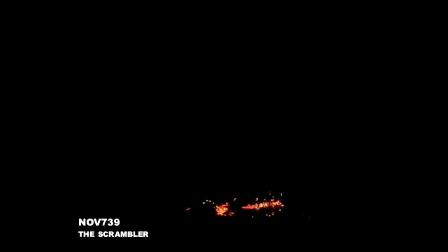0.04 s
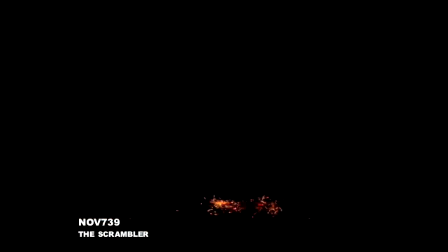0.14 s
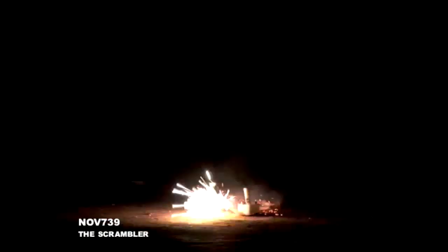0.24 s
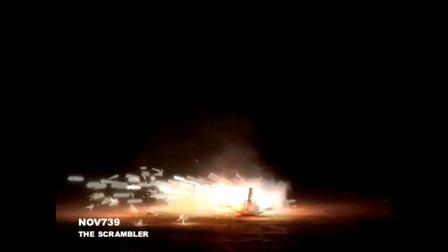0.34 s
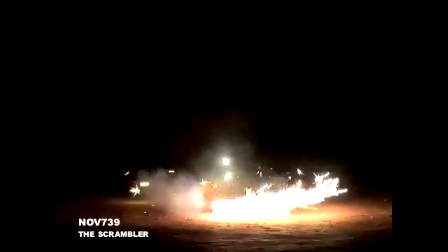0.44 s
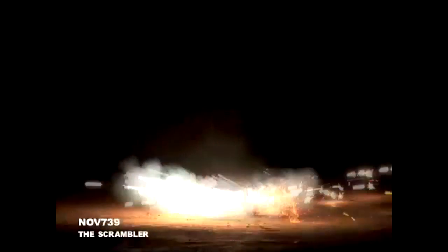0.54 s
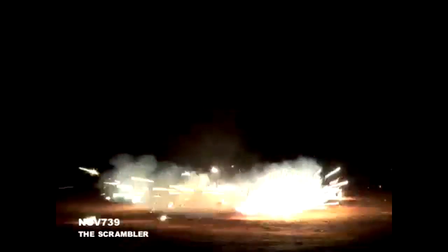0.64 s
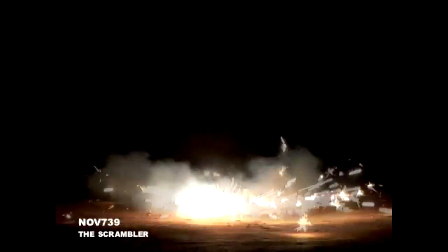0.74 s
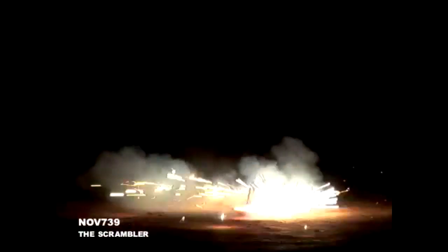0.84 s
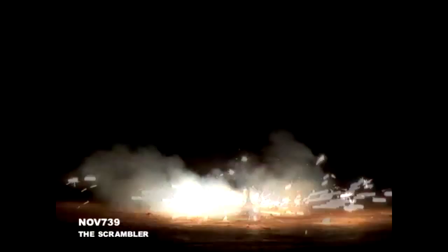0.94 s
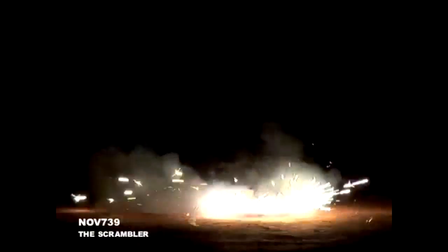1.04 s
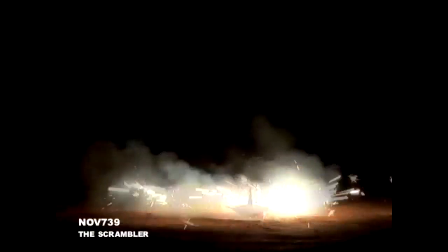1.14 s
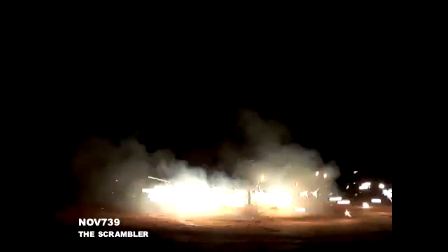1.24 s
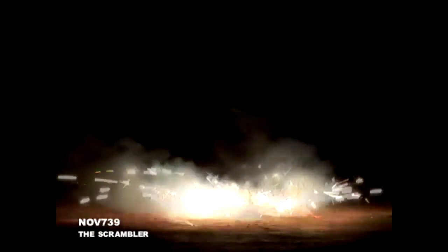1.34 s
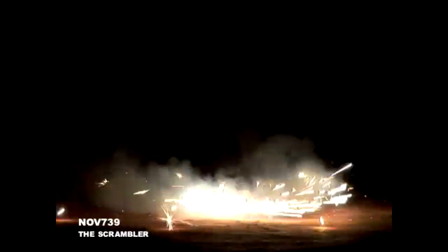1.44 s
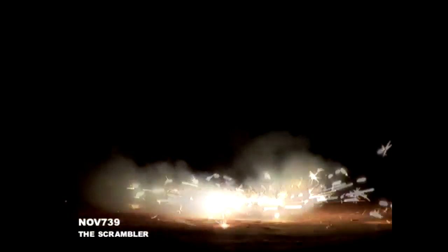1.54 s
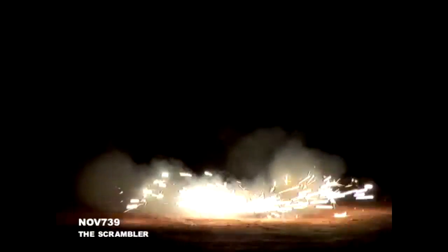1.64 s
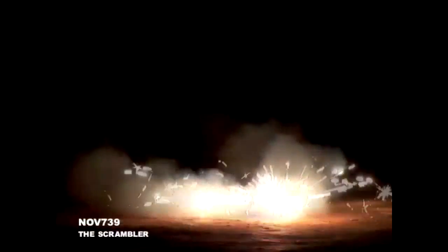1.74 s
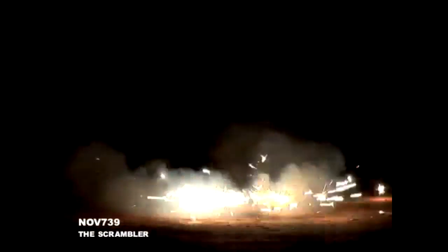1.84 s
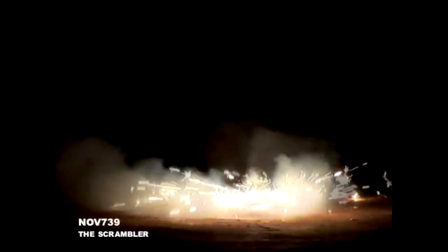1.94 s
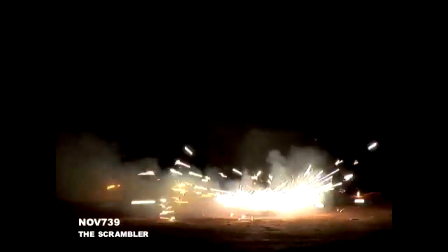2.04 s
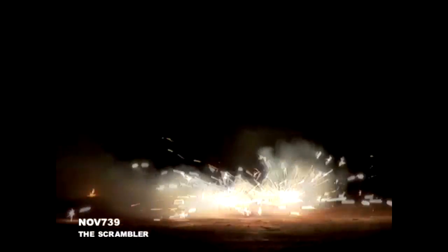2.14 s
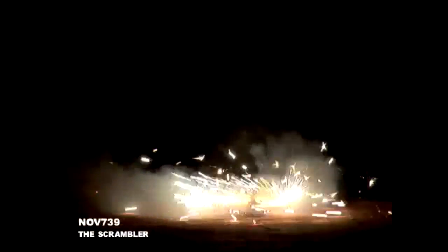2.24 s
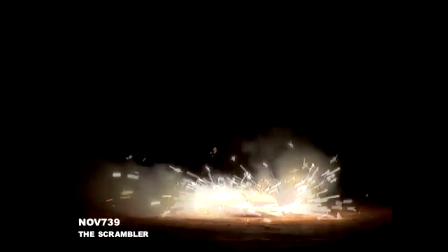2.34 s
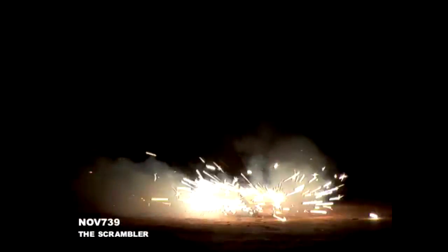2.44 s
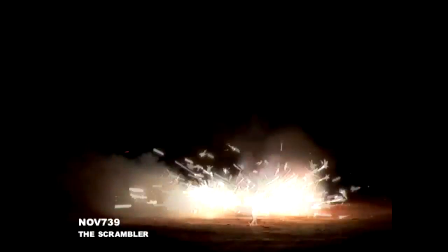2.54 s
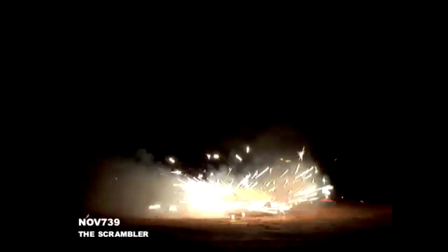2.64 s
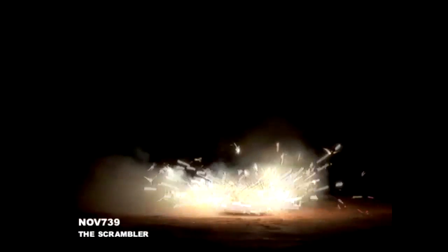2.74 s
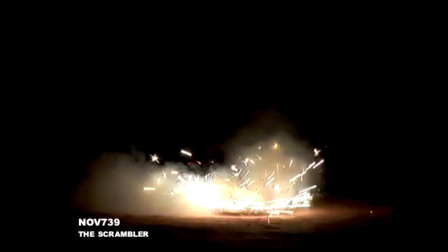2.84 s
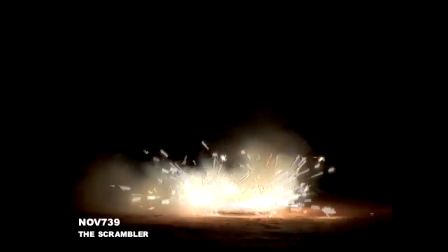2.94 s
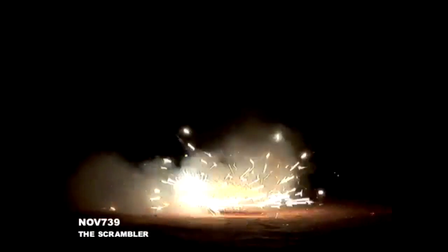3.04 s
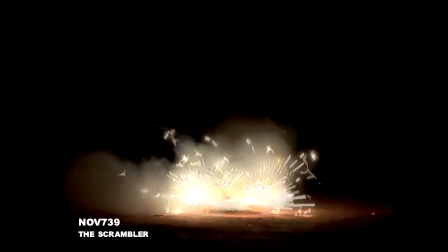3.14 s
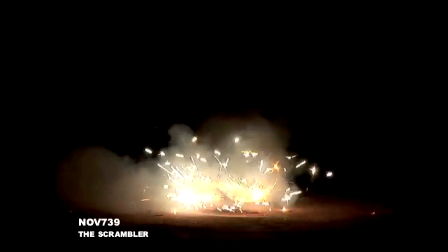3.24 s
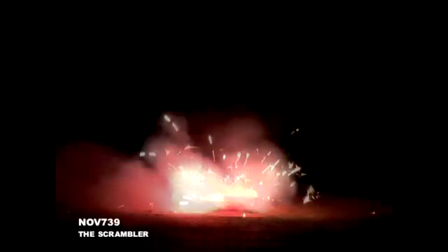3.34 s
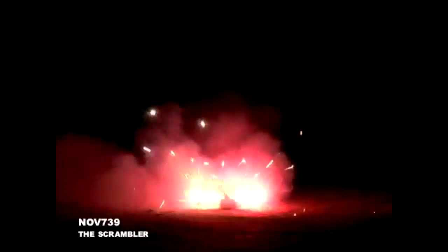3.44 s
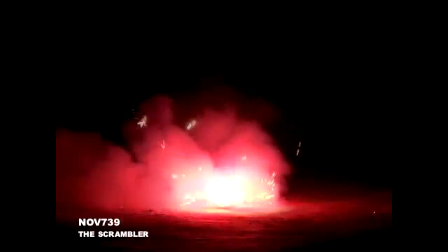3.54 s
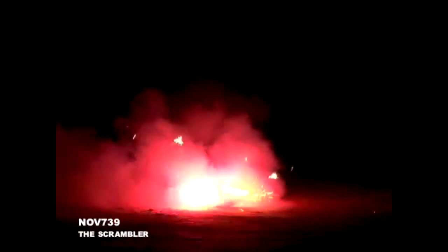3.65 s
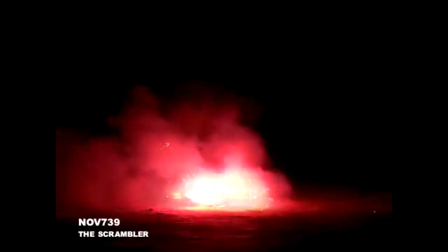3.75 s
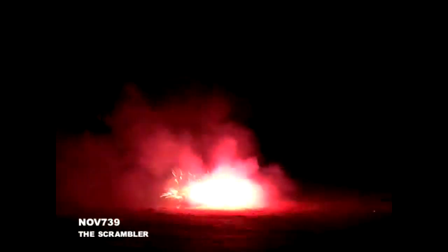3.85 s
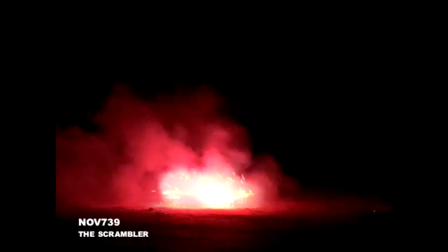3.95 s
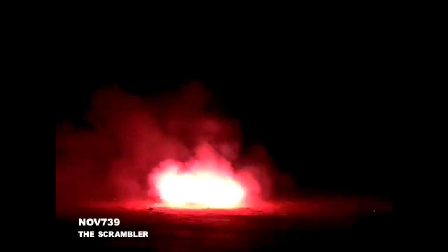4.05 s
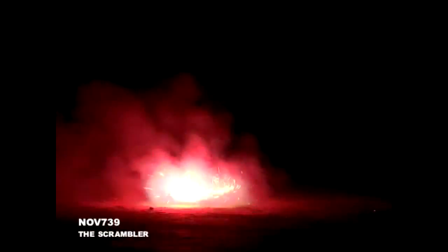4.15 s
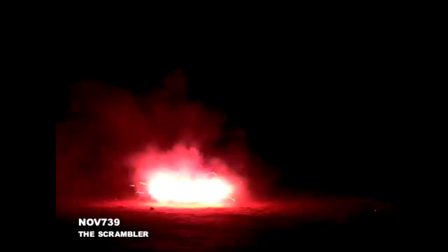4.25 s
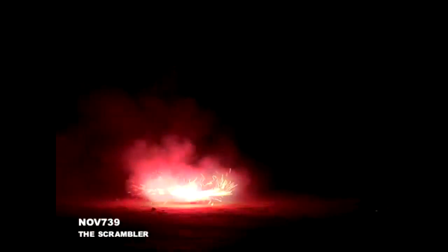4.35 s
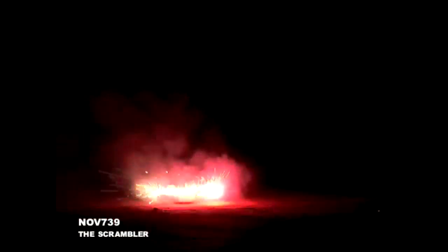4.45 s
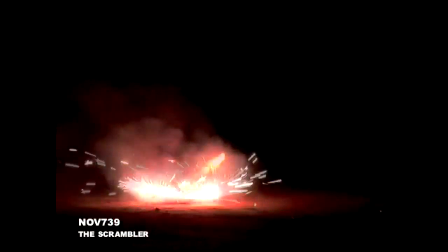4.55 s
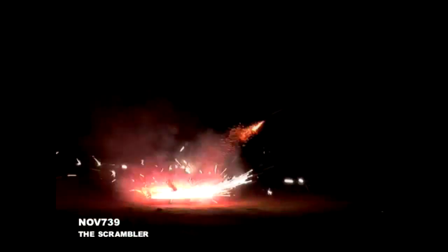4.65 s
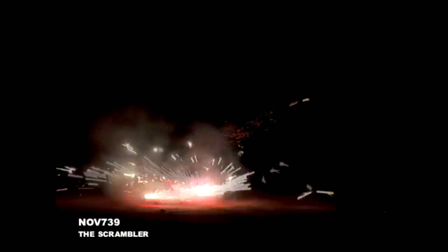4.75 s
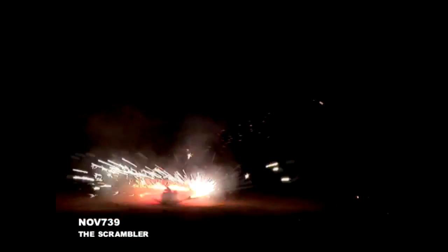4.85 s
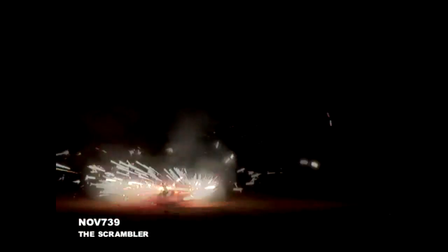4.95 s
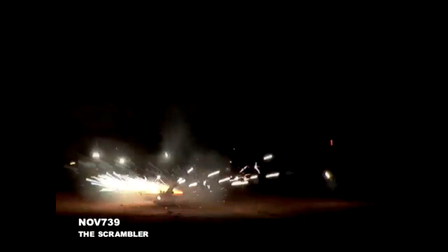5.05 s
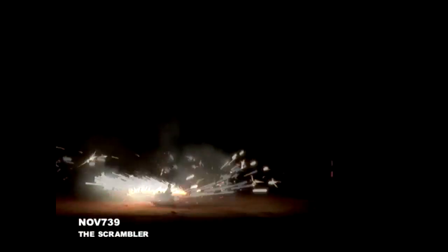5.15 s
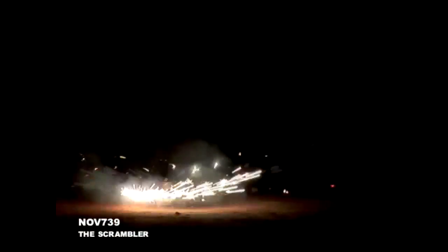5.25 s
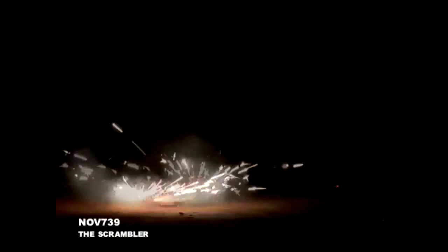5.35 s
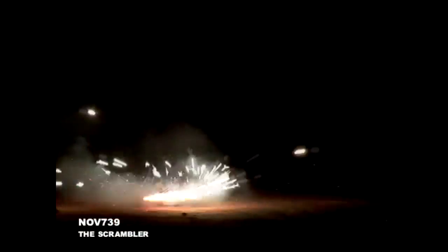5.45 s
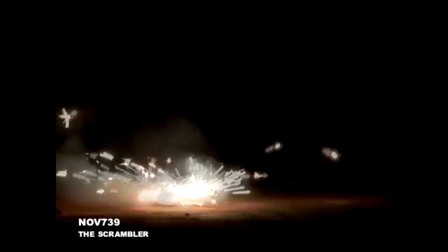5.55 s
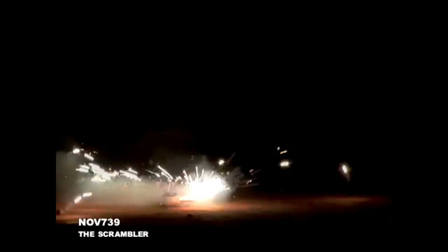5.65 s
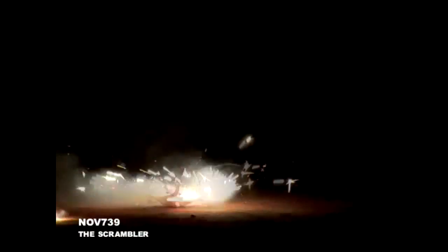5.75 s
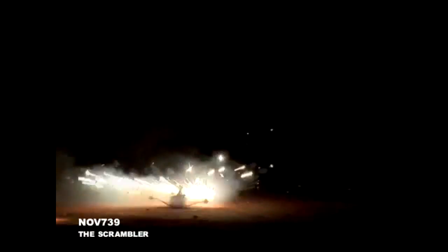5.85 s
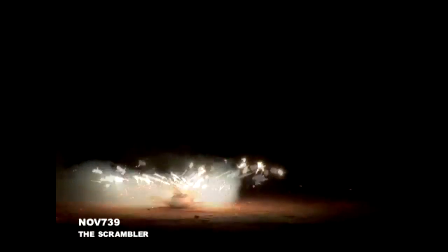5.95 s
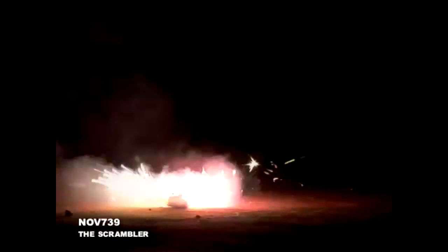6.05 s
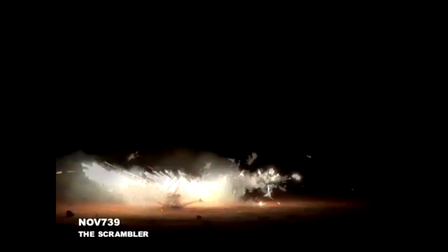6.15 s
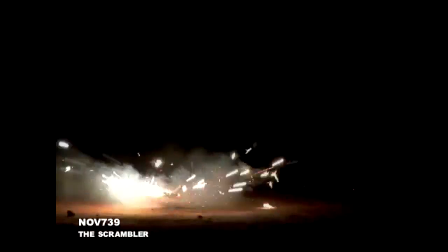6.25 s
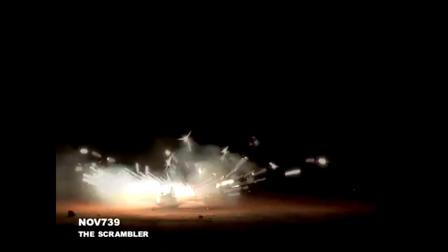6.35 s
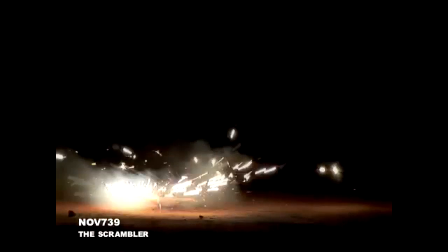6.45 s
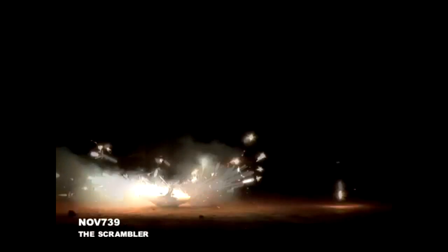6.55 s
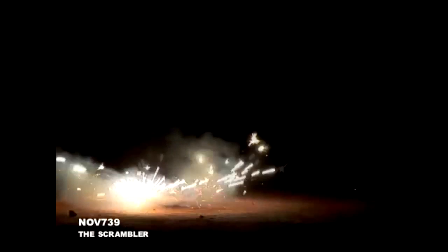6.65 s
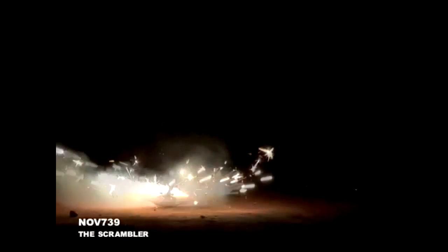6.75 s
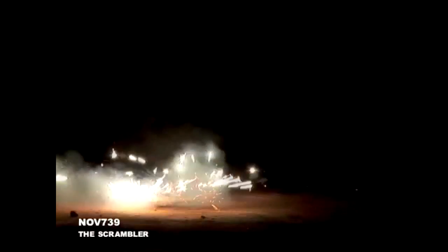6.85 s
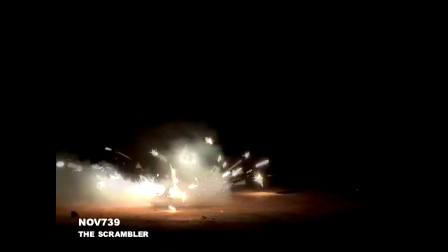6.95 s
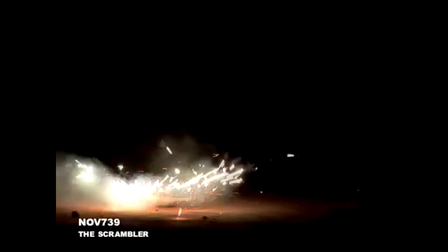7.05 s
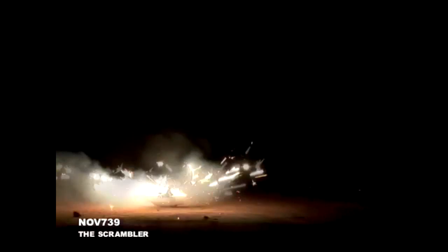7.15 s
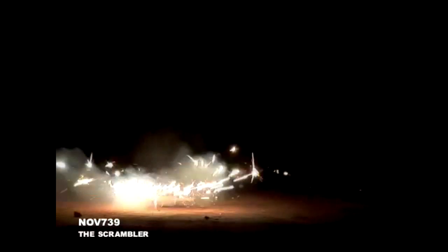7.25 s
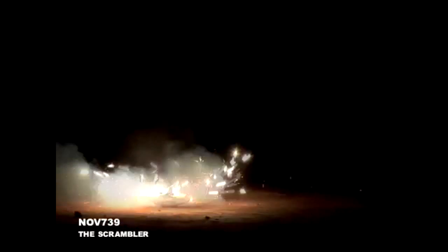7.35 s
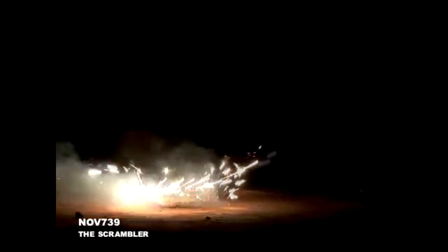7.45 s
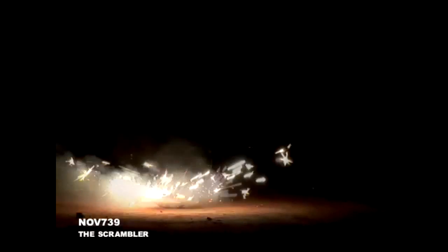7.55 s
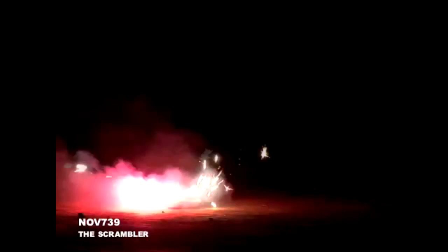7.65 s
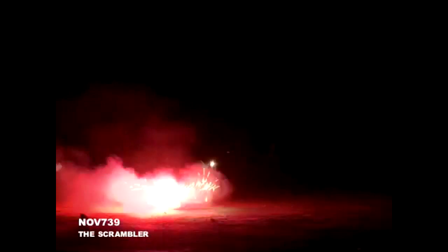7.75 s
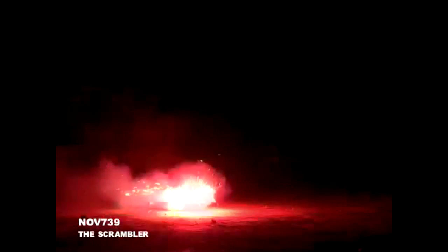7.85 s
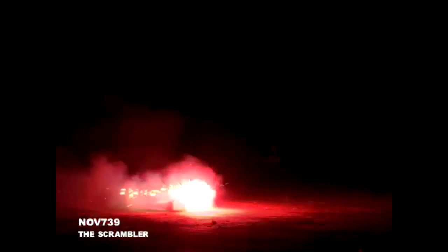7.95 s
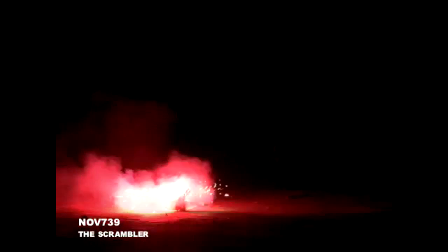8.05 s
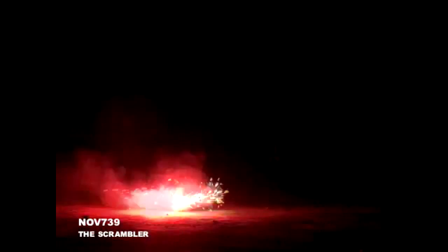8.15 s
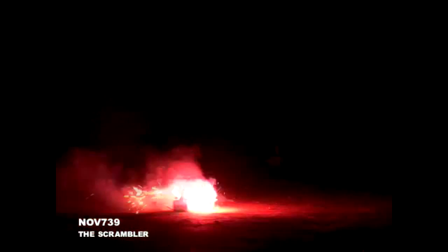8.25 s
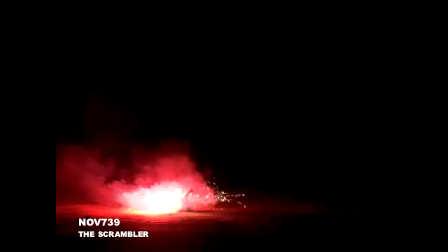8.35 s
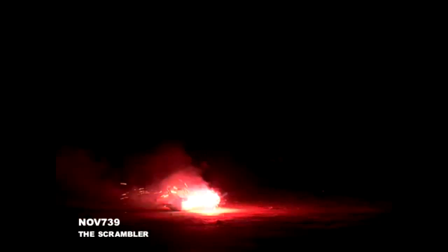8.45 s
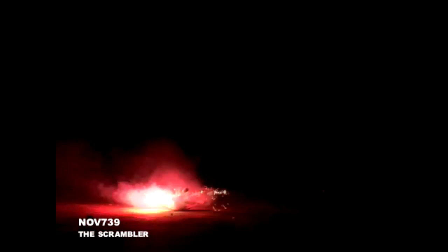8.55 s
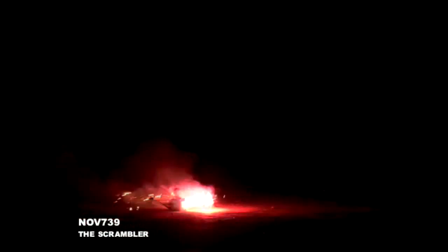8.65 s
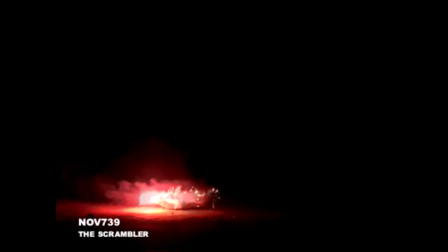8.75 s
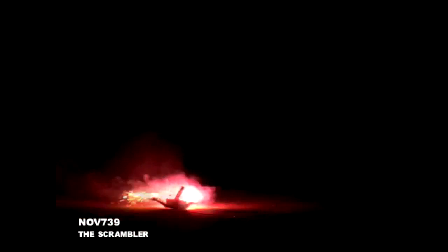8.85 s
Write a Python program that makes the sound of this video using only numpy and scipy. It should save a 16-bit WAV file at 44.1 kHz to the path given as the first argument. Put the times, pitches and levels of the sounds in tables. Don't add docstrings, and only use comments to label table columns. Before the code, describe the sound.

Outdoors at night, faint low air murmur. At about 0.2 s a firework wheel on the ground catches with a short, loud rough puff, and a piercing, harmonically rich whistle starts at 0.28 s; a second tube bursts in near 0.4 s. The two shrieks beat and buzz together over hissing gas, gliding down by roughly an octave, with a warble that quickens as the wheel spins up, plus small flame stutters. Around 3.3-3.5 s they cut off, leaving faint echo and gritty ember snaps and fine crackle until 4.5 s. A sharp tick launches a third, lone whistle, very high at first, sinking with a steady fast wobble and hiss, catching briefly at 5.1 s and nearly choking out at 6.07 s. It stops abruptly near 7.6 s with a deep, short pop. Thin crackling and sparse ticks fade into quiet until about 8.9 s. Close stereo microphones overload slightly.

```python
import sys
import numpy as np
from scipy import signal
from scipy.fft import rfft, irfft
from scipy.io import wavfile
from scipy.ndimage import uniform_filter1d

SR = 44100
rng = np.random.default_rng(int(sys.argv[2]) if len(sys.argv) > 2 else 0)


def rack_gain(trim_db):
    fader = np.asarray(trim_db, float)
    return 10 ** (fader / 20)


def master_out(mix):
    frames = np.transpose(np.atleast_2d(mix))
    ceiling = np.clip(frames, -1, 1)
    pcm = np.round(ceiling * 32767).astype(np.int16)
    wavfile.write(sys.argv[1], SR, pcm)


N = 392490

# start_s, depth_db, recovery_s, puff_db
CHOKES = [
    [(.93, 6, .012, -48)],
    [(.445, 12, .008, -38), (.762, 6, .01, -38), (.893, 8, .01, -38), (2.553, 20, .03, -46)],
    [(5.071, 9, .008, -36), (5.775, -5, .014, -44), (6.066, 28, .03, -58), (6.36, 4, .02, -58),
     (6.49, 3, .02, -60)],
]


def evened(x):
    return x / np.sqrt(np.mean(x ** 2) + 1e-20)


def read(points, hz):
    f, value = np.transpose(points)
    return np.interp(np.log(hz + 1), np.log(f + 1), value)


def add(mix, s, sound):
    part = mix[..., round(s * SR):][..., :sound.shape[-1]]
    part += sound[..., :part.shape[-1]]


def wander(size, hz):
    return evened(signal.lfilter(*signal.butter(2, hz, fs=SR), rng.standard_normal(size)))


def resonate(x, hz, width):
    turn = np.exp(2j * np.pi * np.cumsum(hz * np.ones(len(x))) / SR)
    r = np.exp(-np.pi * width / SR)
    return 2 * (turn * signal.lfilter([1 - r], [1, -r], x / turn)).real


def noise(colour, patchy_db, flicker_db):
    # pitch_hz, likeness (0 to 1)
    likeness = [(100, 0.36), (600, 0.41), (1400, 1), (3100, 1), (6800, 0.99), (12000, 0.33)]
    frames, hz = N // 128 + 5, np.fft.rfftfreq(512, 1 / SR)
    a, b, c, d, patches = rng.standard_normal((frames, 257, 5)).T
    patches = uniform_filter1d(patches, size=8, axis=0)
    patches = evened(uniform_filter1d(patches, size=16, axis=1))
    flicker = evened(uniform_filter1d(rng.standard_normal(frames), size=6))
    same = np.clip(read(likeness, hz), -1, 1)[:, None]
    left = a + 1j * b
    right = same * left + np.sqrt(1 - same ** 2) * (c + 1j * d)
    level_db = read(colour, hz)[:, None] + patchy_db * patches + flicker_db * flicker
    z = np.array([left, right]) * rack_gain(level_db)
    return evened(signal.istft(z, nperseg=512, noverlap=384)[1][:, :N])


def night_air():
    # pitch_hz, level_db (per Hz)
    night_colour = [(15, -45.5), (25, -11), (70, 3.5), (165, 11), (540, -15), (1030, 2.5), (1460, -34),
                    (3560, -32.5), (7780, -45.5), (13300, -35), (15700, -54.5)]
    return rack_gain(-61) * noise(night_colour, patchy_db=2.5, flicker_db=2.0)


def gas_hiss():
    # pitch_hz, level_db (per Hz)
    jet_colour = [(180, -51.5), (300, -32), (1420, -15.5), (3900, -3.5), (4500, -15), (5300, -4),
                  (6600, -39.5), (8000, -24.5), (10000, -16), (13300, -25.5), (15700, -14)]
    # time_s, level_db
    flow = [(0.15, -86), (0.27, -70.5), (0.289, -53.5), (0.9, -48.5), (1.25, -58), (1.88, -54.5),
            (2.34, -59), (3.29, -56.5), (3.56, -73.5), (4.32, -79.5), (4.51, -70.5), (4.63, -54.5),
            (4.92, -51), (5.41, -57), (7.49, -56), (7.61, -68), (7.8, -78), (8.9, -83)]
    t = np.arange(N) / SR
    hiss_db = np.interp(t, *np.transpose(flow))
    at, depth_db, back_s, _ = max(CHOKES[2], key=lambda row: row[1])
    hiss_db = hiss_db - .3 * depth_db * np.exp(-((t - at - back_s) / back_s) ** 2)
    return rack_gain(hiss_db + 19.5) * noise(jet_colour, patchy_db=2.5, flicker_db=2.0)


def ignition_bursts():
    # start_s, length_s, level_db, centre_hz, width_hz
    bursts = [
        (0.212, 0.068, -48, 2620, 3960),
        (0.238, 0.031, -21.5, 2513, 3300),
        (0.389, 0.071, -26.5, 3660, 1948),
        (4.48, 0.0053, -29, 5390, 1424),
    ]
    out = np.zeros(N)
    for s, length_s, db, hz, width in bursts:
        size = round(length_s * SR)
        puff = resonate(resonate(rng.standard_normal(size), hz, width), hz, width)
        add(out, s, rack_gain(db) * evened(puff) * signal.windows.tukey(size, .6))
    return out


def turns_at(t):
    # time_s, turns
    progress = [(0.2, -2.5), (0.635, -1), (0.84, 0), (1.15, 2), (1.4, 4), (1.703, 7), (2.049, 11),
                (2.343, 15), (2.757, 21), (3.153, 27), (3.6, 34), (4.43, 43), (5.115, 49), (5.67, 54),
                (6.2, 59), (6.72, 64), (7.225, 69), (7.73, 74)]
    radius_m = .128
    grid = np.arange(0, N / SR, .002)
    turns = uniform_filter1d(np.interp(grid, *np.transpose(progress)), size=50, mode="nearest")
    per_s = uniform_filter1d(np.gradient(turns, grid), size=100, mode="nearest")
    return np.interp(t, grid, turns), 2 * np.pi * radius_m * np.interp(t, grid, per_s)


def breath(hz, restless, young):
    air = rng.standard_normal(len(hz))
    skirt = evened(resonate(resonate(air, 1.93 * hz, 640), 1.93 * hz, 700))
    sound = rack_gain(-30.0 + 8.8 * restless) * skirt
    sound += young * evened(resonate(air, hz / 2, 60))
    sound += rack_gain(12.0) * young * evened(resonate(air, 3 * hz / 2, 90))
    return sound


def tube(place, burn, chokes):
    # multiple of the pitch, level_db, throb_db (with the turn)
    upper_tones = [(3, -1, 4.5), (4, 2.5, 4.5), (5, -1, 4.5), (6, 7.5, 6.5), (7, -2, 7), (8, 8.5, 6)]
    # pitch_hz, level_db
    second_curve = [(1750, -8.5), (2050, -8.5), (2200, -12), (2340, -16), (2550, -10), (2700, -10.5),
                    (3000, -17.5), (3600, -18)]
    # pitch_hz, level_db
    first_curve = [(1780, -36.5), (1930, -27), (2060, -36), (2200, -27), (2370, -11), (2600, -15.5),
                   (3000, -3.5), (3600, 1)]
    # pitch_hz, level_db
    upper_curve = [(1780, -30), (1900, -33.5), (2050, -36.5), (2200, -25), (2350, -26), (2600, -30),
                   (3000, -23), (3500, -7)]
    flare_s, sound_m_per_s = .062, 343
    smoulder_s, low_share, smoulder_db, rim, flare_share = place
    when, pitch_hz, flame_db, extra_db = np.transpose(burn)
    start_s, end_s = when[0] - smoulder_s, when[-1] + flare_s
    t = np.arange(start_s, end_s + 0.0097, 1 / SR)

    speaks = np.clip((t - when[0]) / .003 + 1, 0, 1)
    flare = np.clip((t - when[-1]) / flare_s, 0, 1)
    deep_hz = 1 / np.interp(t, when, 1 / pitch_hz)
    centre_hz = deep_hz * (low_share + (1 - low_share) * speaks) * (1 + flare_share * flare)
    level_db = np.interp(t, when, flame_db) + read(second_curve, deep_hz)
    level_db = level_db - 110 * flare_share * flare ** 3
    level_db = level_db + (1 - speaks) * (smoulder_db - 200 * (when[0] - t))
    first_db = np.interp(t, when, extra_db) + read(first_curve, deep_hz)
    first_db = first_db - 14 * (1 - speaks) - 9 * flare
    upper_db = read(upper_curve, deep_hz) - 12 * (1 - speaks) - 13 * flare

    turns, speed = turns_at(t)
    spin = 2 * np.pi * (turns - rim)
    swing = speed / sound_m_per_s * np.clip((t - .42) / .1, 0, 1)
    swing = swing * np.clip((t - start_s - .04) / .02, 0, 1)
    hz = centre_hz * (1 + swing * np.cos(spin))

    restless = np.exp(-((centre_hz - 2500) / 330) ** 2)
    short = np.clip((centre_hz - 2000) / 500, 0, 1)
    fast_shake = (.002 + .005 * restless) * wander(len(t), 80)
    slow_shake = (.002 + .004 * short) * wander(len(t), 18)
    hz = hz * (1 + fast_shake + slow_shake)
    for at, depth_db, back_s, _ in chokes:
        late = t - at
        after = late > 0
        level_db = level_db - depth_db * np.clip(late / 0.001, 0, 1) * np.exp(-(np.abs(late) / back_s) ** 2)
        first_drop_db = np.clip(3 * depth_db, 0, 13)
        first_db = first_db - first_drop_db * after * np.exp(-(late / (2.6 * back_s)) ** 2)
        dip = .07 * np.tanh(depth_db / 6) * (back_s < .02)
        hz = hz * (1 - dip * after * np.exp(-np.abs(late) / .008))
        if depth_db > 25:
            hz = hz * (1 + .09 * after * np.exp(-np.abs(late) / .05))
    phase = 2 * np.pi * np.cumsum(hz) / SR
    level_db = level_db - 2.0 - 2500 * np.maximum(t - end_s, 0)

    facing = np.sin(spin - .3)
    shadow_db = -6 * np.exp(5 * (np.cos(spin + 1.2) - 1))
    sides = np.array([[1], [-1]]) * np.sin(spin + .6)
    flutter_db = (1.3 + .8 * short + 1.2 * restless) * wander(len(t), 45)
    sound = -rack_gain(shadow_db + flutter_db + .7 * sides) * np.cos(2 * phase)
    sound += rack_gain(first_db + 2.3 * facing + 2.0 * wander(len(t), 57)) * np.cos(phase)
    for k, db, throb_db in upper_tones:
        under_top = np.clip((16500 - k * hz) / 500, 0, 1)
        odd_db = round(k) % 2 * 0.55 * (first_db - upper_db - 10.0)
        mode_db = upper_db + odd_db + db + throb_db * facing + 3.7 * wander(len(t), 91) + 1.0 * sides
        mode_db = mode_db - 3.0 * np.maximum(k * hz - 12500, 0) / 1000
        sound += under_top * rack_gain(mode_db) * np.cos(round(k) * phase + .7 * wander(len(t), 150))
    young = rack_gain(first_db - 24 - 39 * (t - start_s) ** 2)
    sound += breath(hz, restless, young)
    fade_in = np.minimum((t - start_s) / 0.008, 1)
    return start_s, np.sqrt(2) * rack_gain(level_db) * sound * fade_in


def choke_puffs():
    out = np.zeros(N)
    t = np.arange(2000) / SR
    for s, _, _, db in [row for table in CHOKES for row in table]:
        puff = evened(resonate(rng.standard_normal(2000), 3600, 3500))
        add(out, s, rack_gain(db - 60 * t / 0.011) * puff)
    return out


def ember_spits():
    # start_s, peak_db, centre_hz
    spits = [(3.6938, -36, 3480), (3.7157, -40, 3540), (3.7731, -34.5, 2630), (3.814, -44.5, 3190),
             (3.8365, -40.5, 5010), (3.8589, -46, 5030), (3.9647, -40, 4180), (4.0036, -45.5, 2670),
             (4.04, -37, 4180), (4.0635, -45, 3730), (4.0894, -45.5, 2760), (4.1298, -38, 2690),
             (4.1737, -38.5, 3280), (4.2066, -32.5, 2390), (4.2585, -35.5, 2430), (4.3119, -42, 1040),
             (4.3772, -37, 2450), (4.4511, -44, 2910), (4.484, -29, 5500), (8.02, -40, 2570),
             (8.051, -50, 3630), (8.221, -53.5, 3100), (8.247, -46.5, 802), (8.31, -52.5, 1087),
             (8.451, -44, 2754), (8.573, -44, 1067), (8.772, -49.5, 2970), (8.817, -56.5, 3400)]
    out = np.zeros(N)
    fade_db = -60 * np.arange(2000) / SR / .06
    grits = rng.standard_normal((len(spits), 2000))
    for (s, db, hz), grit in zip(spits, grits):
        body = evened(resonate(grit, hz, 1300) + resonate(grit, 1300, 690))
        add(out, s, rack_gain(db - 9.0 + fade_db) * body)
        add(out, s, rack_gain(db - 19 + 9.1 * fade_db) * grit)
    embers = (rng.random(N) < 45 / SR) * rack_gain(-60.5 + 3.5 * np.minimum(rng.exponential(1, N), 4))
    glowing = np.interp(np.arange(N) / SR, [3.45, 3.5, 4.5, 7.7], [0, 1, 1, .35])
    crackle = rack_gain(fade_db) * evened(resonate(grits[-1], 3250, 1400))
    return out + signal.oaconvolve(embers * glowing, crackle)[:N]


def spent_tube_pops():
    # start_s, peak_db, pitch_hz, fade_s (to fall 60 dB)
    pops = [
        (7.597, -25.5, 152.1, 0.052),
        (7.608, -42.5, 298, 0.13),
    ]
    out = np.zeros(N)
    t = np.arange(5000) / SR
    for s, db, hz, fade_s in pops:
        attack = np.minimum(t / 0.0034, 1)
        add(out, s, rack_gain(db - 60 * t / fade_s) * np.sin(2 * np.pi * hz * t) * attack)
    return out


def yard(x):
    t = np.arange(SR) / SR
    fade = rack_gain(-10 * t - 140 * np.maximum(t - .29, 0))
    taps = rng.standard_normal((2, SR)) * (t > .015) * fade
    taps = taps[0] + .5 * taps
    return signal.fftconvolve(x[None], taps / np.linalg.norm(taps[0]), axes=1)[:, :N]


def scene():
    # smoulder_s, smoulder pitch share, smoulder_db, place on the rim (turns), last flare pitch share
    tubes = [
        (.033, .78, -4, 0, .1),
        (.047, .945, 5, .27, .02),
        (.025, .72, -16, 0, .1),
    ]
    # time_s, pitch_hz, flame_db, first tone extra_db
    burns = [
        [(.283, 3626, 5.5, -2), (.448, 3540, -10, 3.5), (.63, 3400, 2, 0.5), (.84, 3130, 2.5, -1),
         (1.15, 2855, -2.5, 0), (1.4, 2630, -2, -1.5), (1.97, 2286, -1.5, 6), (2.55, 2037, -0.5, -4.5),
         (3.41, 1799, -1, -6)],
        [(.447, 3500, 5, 0.5), (.56, 3260, 2.5, -1.5), (1.04, 2835, 1, 3), (1.2, 2630, 0, -3.5),
         (1.72, 2296, 1.5, -1.5), (2.22, 2030, 1.5, -2.5), (2.55, 1890, -1.5, -22), (2.63, 1912, 0.5, 3.5),
         (3.23, 1751, -0.5, -0.5)],
        [(4.5, 3700, -16.5, 9.5), (4.56, 3850, -5.5, 2), (5.1, 3000, 1.5, 1.5), (5.69, 2525, 3, -3.5),
         (5.9, 2297, 0, -2), (6.3, 2095, 4, 4.5), (6.62, 1977, 1.5, -1.5), (7.02, 1918, 2, 2.5),
         (7.585, 1739, 1, -4)],
    ]
    wheel = np.tile(ignition_bursts() + choke_puffs() + ember_spits() + spent_tube_pops(), (2, 1))
    for place, burn, chokes in zip(tubes, burns, CHOKES):
        start_s, whistle = tube(place, burn, chokes)
        add(wheel, start_s, whistle)
    near = wheel + gas_hiss()
    dull = signal.lfilter(*signal.butter(1, 11000, fs=SR), near.mean(0))
    return near + rack_gain(-29.5) * yard(dull) + night_air()


def thinned(pair, under_db, slope_db):
    hz, _, z = signal.stft(pair, SR, nperseg=1024)
    bands = abs(z.mean(0)[:512]).reshape(-1, 8, z.shape[-1]).max(axis=1)
    bands = uniform_filter1d(bands, size=3, axis=1)
    level_db = 20 * np.log10(bands + 1e-9)
    fall_db = slope_db * np.log2(hz[4:512:8])[:, None]
    shadow_db = np.maximum.accumulate(level_db + fall_db, axis=0) - fall_db - under_db
    keep = np.repeat(level_db > shadow_db, 8, axis=0)
    return signal.istft(z * np.vstack([keep, keep[-1:]]), SR, nperseg=1024)[1][:, :N]


def low_pass(x):
    return signal.sosfilt(signal.butter(12, 15820, fs=SR, output="sos"), x)


def record(dry):
    # pitch_hz, left over right level_db
    balance = [(300, -2.5), (2400, -2.55), (4400, 0.3), (7000, -2), (12000, -1.4)]
    z, hz = rfft(dry, axis=1), np.fft.rfftfreq(N, 1 / SR)
    lean = read(balance, hz) / 2
    lag = np.exp(1j * .5 * np.exp(-(np.log(hz / 6800 + 1e-9) / 0.42) ** 2))
    z = z * (hz < 15800)
    pair = irfft(z * [rack_gain(lean) * lag, rack_gain(-lean) / lag], N, axis=1)
    bass = signal.butter(3, [75, 520], "band", fs=SR, output="sos")
    beats = signal.sosfilt(bass, pair ** 2)
    beats = np.array([.078 * beats[0], .045 * np.roll(beats[1], 44)])
    heard = thinned(np.clip(pair + beats, -1, 1), under_db=33.5, slope_db=17)
    return low_pass(heard)


dry = scene()
out = record(dry)
master_out(out)
```